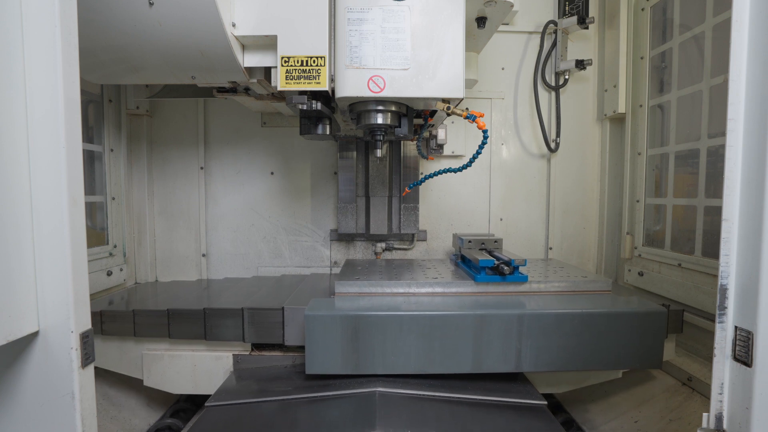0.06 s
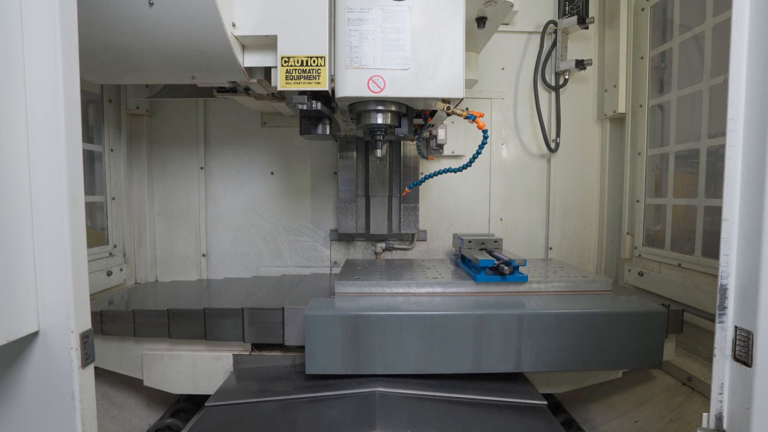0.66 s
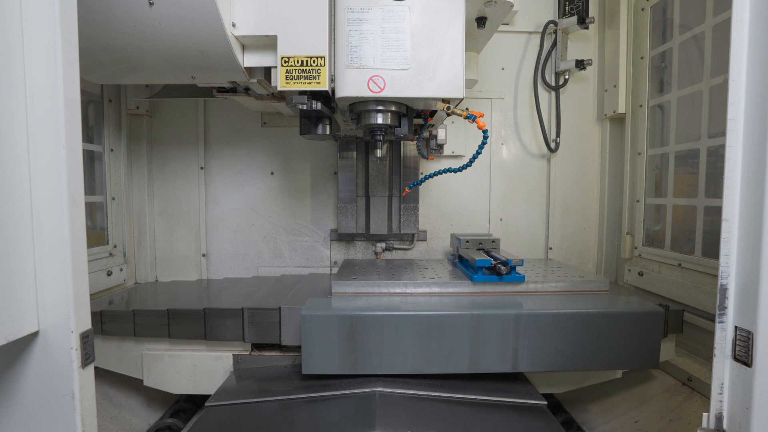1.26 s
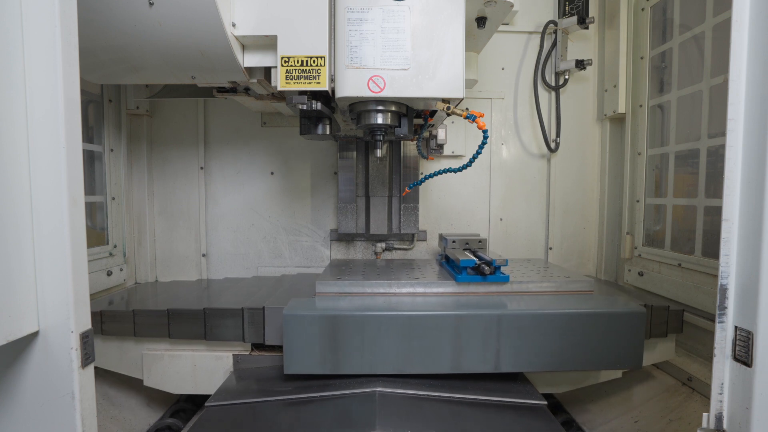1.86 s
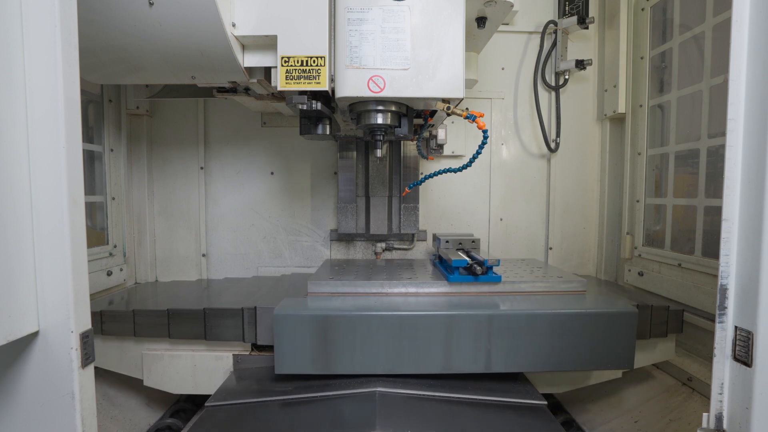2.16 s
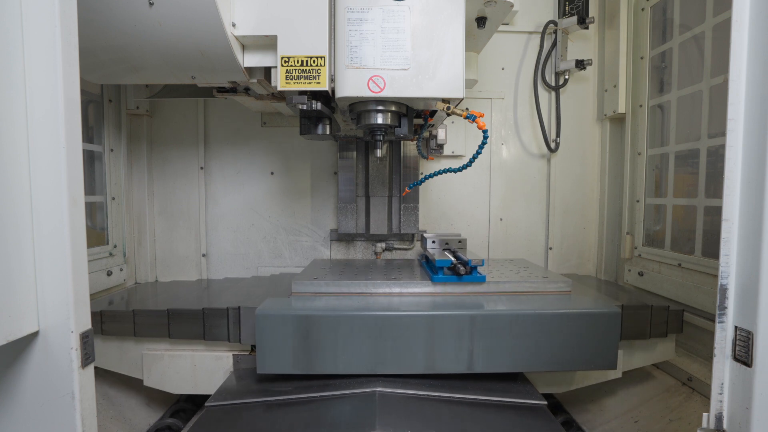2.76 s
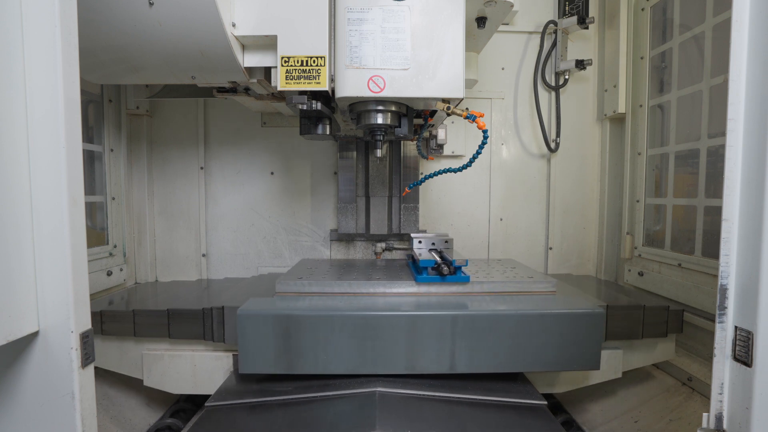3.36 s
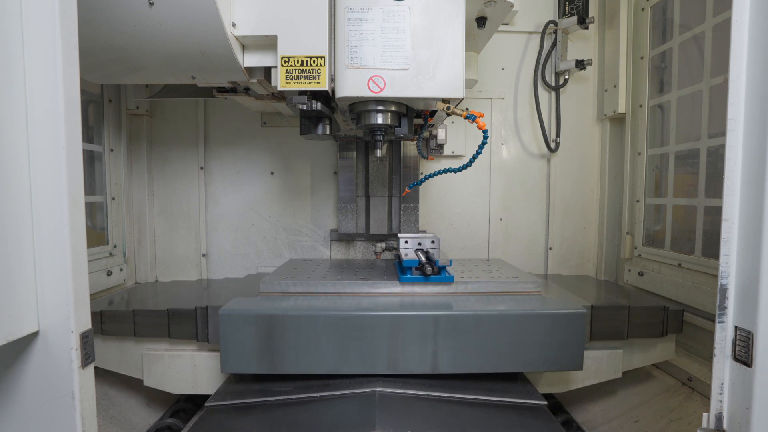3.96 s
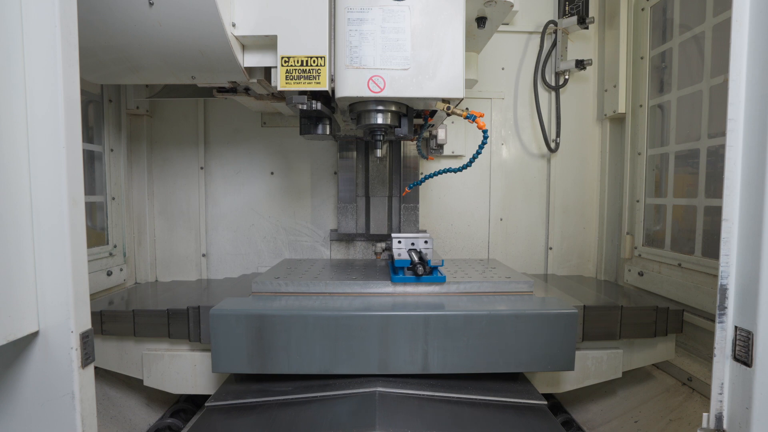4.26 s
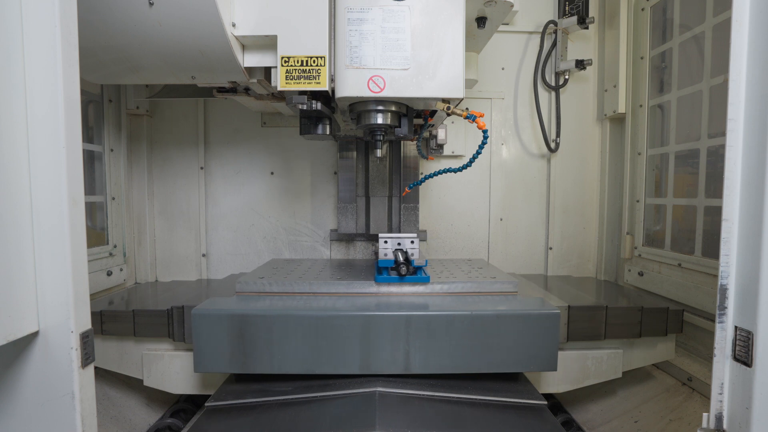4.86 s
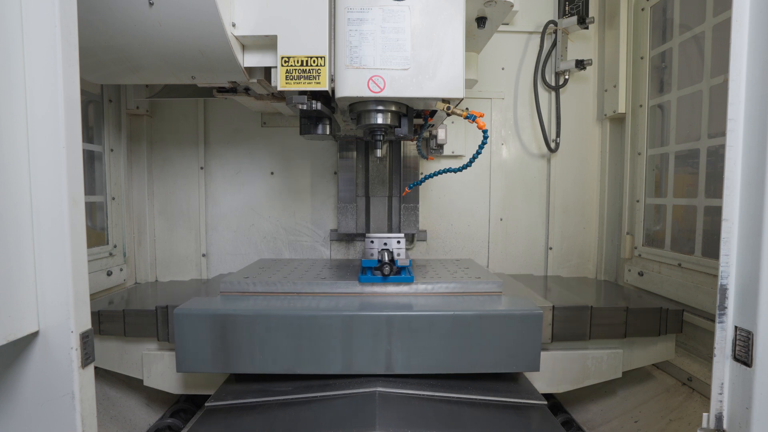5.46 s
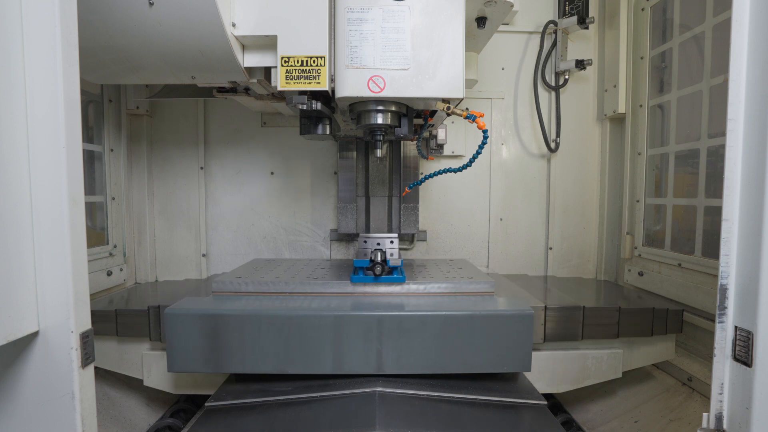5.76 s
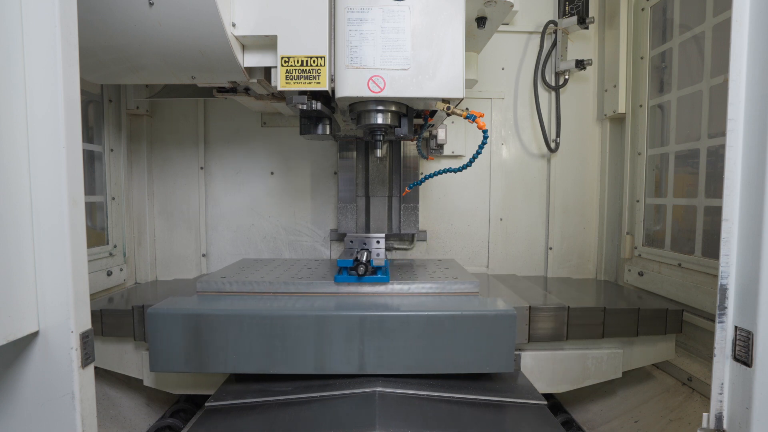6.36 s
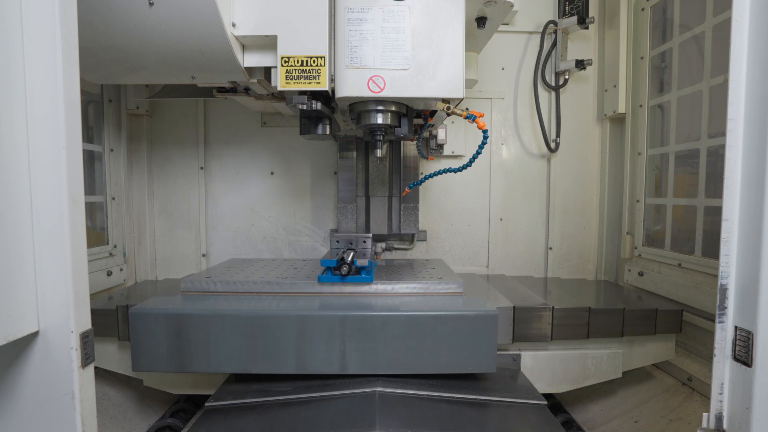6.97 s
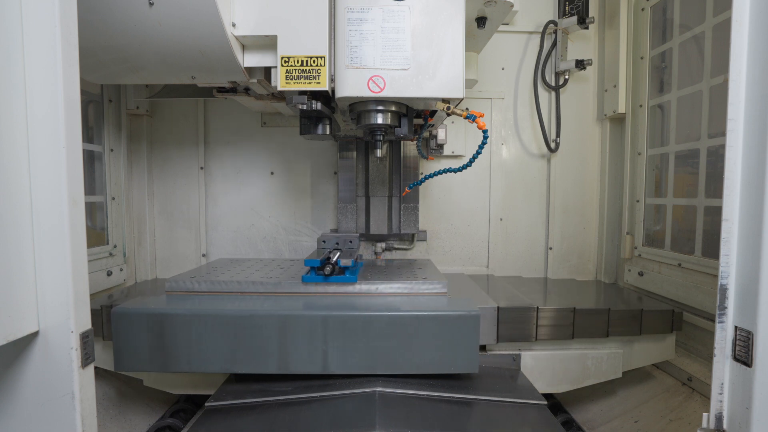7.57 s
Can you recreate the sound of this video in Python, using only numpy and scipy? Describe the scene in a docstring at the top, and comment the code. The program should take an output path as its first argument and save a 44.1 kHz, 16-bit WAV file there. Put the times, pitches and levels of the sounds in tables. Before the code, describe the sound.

A milling machine spindle spins up with a rising hum and whine, then holds a steady high speed over fan noise and hiss.

```python
"""A rising hum and whine: a machining centre's spindle runs up to 10000 rpm in its open steel enclosure
and holds that speed. Shaft orders, tones at multiples of the shaft speed, swell and fade as they cross
the enclosure's standing waves and as the table glides by. The ball bearings sing, loudest under
acceleration, over the hiss of air and the drone of fans and pumps."""
import sys
import numpy as np
from scipy import signal
from scipy.fft import rfft, irfft
from scipy.io import wavfile
from scipy.ndimage import uniform_filter1d

SR = 44100
rng = np.random.default_rng(int(sys.argv[2]) if len(sys.argv) > 2 else 0)


def generate_wav(signal):
    """Clip the signal to [-1, 1] and save it as 16-bit WAV at the path in sys.argv[1]."""
    frames = np.transpose(np.atleast_2d(signal))
    scaled = np.clip(frames, -1, 1) * 32767
    pcm = np.round(scaled).astype(np.int16)
    wavfile.write(sys.argv[1], SR, pcm)


N = 339570
TIME = np.arange(N) / SR
START_HZ, FULL_HZ = 104.63, 166.63  # shaft turns per second


def run_up(balance_hz=208.77, inertia_s=3.34, ease_s=0.21):
    """Shaft speed and the drive's pull (1 to 0): constant power fights drag until the set speed is held."""
    free_hz = np.sqrt(balance_hz ** 2 - (balance_hz ** 2 - START_HZ ** 2) * np.exp(-TIME / inertia_s))
    speed = uniform_filter1d(np.minimum(free_hz, FULL_HZ), size=4001, mode="nearest")
    pull = uniform_filter1d((free_hz < FULL_HZ) * 1., int(ease_s * SR), mode="nearest")
    return speed, pull


# Enclosure resonances that lift a passing order: (pitch [Hz], half width [Hz], boost [dB])
ENCLOSURE_PEAKS = [(127, 7.5, 6.4), (163, 5, 11), (286, 11.6, 9.1), (494, 6, 7.5), (562, 18, 8.7),
                   (590, 8.8, 6), (664.6, 6.3, 5.7), (1000, 26, 5), (1068, 18, 3), (1146, 13, 5.5),
                   (1211, 11, 7.5), (1233, 11, 9), (1279, 9, 4.5), (1307, 9, 4)]
# Standing-wave nodes at the listener: (pitch [Hz], half width [Hz], dip [dB])
ENCLOSURE_NODES = [(112, 2, -10), (242, 15, -12), (424, 8, -6), (504, 2, -7), (531, 6.5, -7),
                   (613, 2.8, -9), (634, 17, -6), (753, 31, -9.6), (872, 20, -12), (938, 9, -9),
                   (1010, 4, -11), (1036, 5, -14), (1113, 8, -9), (1170, 5, -9), (1258, 10, -11),
                   (1295, 3.5, -4)]
# The gliding table rides orders 4, 8 and 12: (time [s], level change [dB], pan change to the left [dB])
HUM_RIDE = [(2.3, 1, 5), (2.5, -0.3, 2.46), (3.7, -2.15, 0.8), (4.5, -0.3, 0.9), (6.5, 0, 1.4),
            (7.7, -1.7, -1)]
WHINE_RIDE = [(2.3, -20, -11), (2.5, -0.5, 3.99), (2.9, 3, 1.17), (3.6, 3, 1), (4.35, 0.04, 4.26),
              (5.8, 1.8, -1.5), (6.3, -3.5, -6), (6.8, 0.1, 5), (7.7, 0.7, -0.01)]
TOP_RIDE = [(2.3, -6, 0.0), (2.8, -3.26, -11), (3.3, 3, -17), (4.2, 5, 2.06), (5.7, -5.5, -3),
            (6.5, 3.5, 2), (7.0, -0.5, -15), (7.7, 3.5, -15)]
# The body of the hum and whine: (pitch [x shaft speed], start level [dB], late run-up level [dB],
# idle level [dB], pan left [dB], left ear's lead [rad])
STRONG_ORDERS = [(1, -54.5, -53, -55, 0.5, 0), (2, -46.5, -39.5, -40, 2.5, 0.3),
                 (3, -56, -48, -54, 0, -0.11), (4, -43.5, -29.5, -29.5, 0, -0.15),
                 (6, -53, -53, -58, -4, 0), (8, -41.5, -29.5, -31.5, -3, -0.69),
                 (12, -47, -43.5, -47.5, -3.5, -0.64)]
def motor(angle, speed, pull, flutter=0.045, flutter_hz=20, echo_gain=0.36, echo_hz=1200):
    """Strong shaft orders flutter slightly as they sweep through the enclosure's resonances and nodes."""
    rides = {4: HUM_RIDE, 8: WHINE_RIDE, 12: TOP_RIDE}
    out = np.zeros((2, N))
    for order, start_db, late_db, idle_db, pan_db, lead in STRONG_ORDERS:
        hz = order * speed
        ride_db, swing_db = (1 - pull) * automation(rides[order]) if order in rides else (0, 0)
        colour_db = bells(ENCLOSURE_PEAKS, hz) + bells(ENCLOSURE_NODES, hz)
        level = amp(load_level(speed, pull, start_db, late_db, idle_db) + colour_db + ride_db)
        phase = order * angle + rng.uniform(0, 2 * np.pi) + flutter * wander(flutter_hz)
        ear_phases = np.array([phase + lead / 2, phase - lead / 2])
        tone = enclosed_tone(ear_phases, hz, echo=echo_gain * pull * hz / echo_hz, spacing_hz=12)
        tremble = 1 + flutter * wander(flutter_hz)
        out += level * tremble * panned(pan_db + swing_db) * tone
    return out


# Housing resonances that lift a passing bearing tone: (pitch [Hz], half width [Hz], boost [dB])
HOUSING_PEAKS = [(2560, 80, 5.5), (2730, 55, 5), (2885, 45, 7), (3510, 80, 10.5), (3755, 65, 12),
                 (4103, 14, 12.5), (4290, 130, 10), (4510, 80, 4.5), (4780, 130, 4), (6350, 220, 8),
                 (7020, 170, 10)]
# Where the shaft shakes its bearings hardest: (speed [turns/s], half width [turns/s], boost [dB])
CRITICAL_SPEED = [(136, 13, 4.5)]
# Ball-pass tones and sidebands:
# (pitch [x shaft speed], start level [dB], late run-up level [dB], idle level [dB])
BALL_TONES = [(16.95, -68, -49, -72), (17.95, -66, -45.5, -70), (18.95, -61, -48, -68),
              (19.95, -63, -50, -72), (20.645, -70, -54, -53), (23.8, -56, -58, -68),
              (25.683, -47.5, -52.5, -61.5), (32.15, -53, -52.5, -66), (36.5, -59, -76, -74),
              (41.29, -64, -64, -67), (44.6, -48, -80, -74), (49.6, -60, -80, -76), (51.37, -55, -72, -68),
              (56, -54, -82, -76)]
def bearings(angle, speed, pull, torque, steady_skid_rad=0.008, skid_rad=0.011, chatter=0.4):
    """Ball-pass tones sing through the housing's resonances; under torque the balls skid and chatter."""
    out = np.zeros((2, N))
    for order, start_db, late_db, idle_db in BALL_TONES:
        hz = order * speed
        boost_db = bells(HOUSING_PEAKS, hz) + bells(CRITICAL_SPEED, speed)
        level = amp(load_level(speed, pull, start_db, late_db, idle_db) + boost_db)
        slip = (steady_skid_rad + skid_rad * torque) * wander(rate_hz=20)
        contact = 1 + chatter * torque * wander(rate_hz=25)
        out += level * contact * enclosed_tone(order * (angle + slip), hz, echo=0.42)
    return out * panned(left_db=-3)


# The sheen on the whine:
# (pitch [x shaft speed], full-torque level [dB], zero-torque level [dB], pan left [dB])
WEAK_ORDERS = [(5, -53, -63, 0), (7, -62, -57, 1), (9, -56, -56, -2), (10, -53, -59, -4),
               (16, -55, -54, -1), (17, -58, -60, 5), (18, -56, -59, -4), (20, -57, -54, 2),
               (24, -58, -49.5, 3), (36, -66, -63, 5)]
def overtones(angle, speed, torque):
    """Weak shaft orders thicken the whine, their balance following the torque."""
    out = np.zeros((2, N))
    for order, loaded_db, free_db, pan_db in WEAK_ORDERS:
        tone = enclosed_tone(order * angle + rng.uniform(0, 2 * np.pi), order * speed, echo=0.5)
        out += amp(free_db + torque * (loaded_db - free_db)) * panned(pan_db) * tone
    return out


# The noise bed, fans below and full-speed spindle hiss above: (frequency [Hz], density [dB/Hz])
FAN_DRONE = [(20, -100), (35, -91), (60, -90), (95, -81.5), (130, -83), (215, -82), (290, -78),
             (370, -78.5), (450, -72), (540, -73.5), (610, -68.5), (700, -72), (800, -76), (1000, -71)]
SPINDLE_HISS = [(1000, -70.4), (1130, -71.5), (1270, -66.6), (1400, -71.0), (1700, -73.0), (2200, -70.6),
                (2600, -70.3), (3600, -66.7), (4300, -68.7), (4800, -72.1), (7000, -74.0), (7400, -75.6),
                (8000, -80.6), (12200, -90.5), (13700, -90.6), (15600, -96.3)]
# Rumble and rasp while the drive pulls: (centre [Hz], half width [Hz], density [dB/Hz])
STRAIN_BANDS = [(50, 12, -86), (153, 30, -74.5), (2350, 1400, -74), (3650, 340, -68)]
# Brief panel shudders: (time [s], half length [s], centre [Hz], half width [Hz], density [dB/Hz])
PANEL_SHUDDERS = [(0.09, 0.089, 196, 27, -60.5), (.08, 0.071, 340, 120, -66), (0.034, 0.086, 3700, 69, -75),
                  (1.9, 0.17, 2700, 470, -70)]
# Where the noise sits: (frequency [Hz], pan left [dB])
AIR_PAN = [(130, 0), (400, -1.5), (600, 1.5), (900, 0), (1250, -0.5), (1550, -1), (2400, -1.5),
           (3000, -0.5), (4300, -.7), (6400, -4.5), (7300, -0.5), (8300, -3), (11000, -1.5), (15600, -.3)]
# How narrow its image is: (frequency [Hz], left-right correlation [0 to 1])
AIR_CORRELATION = [(130, 1), (200, 1), (500, 0.85), (670, 0.83), (740, 0.71), (850, 0.8), (1300, 0.57),
                   (1750, 0.77), (2500, 0.33), (3200, 0.22), (4300, 0.12), (6000, 0.3), (9000, .03),
                   (11500, 0.16), (14000, 0.39)]
def air(speed, pull, windage_db=12.5, patch_db=0.83, ripple_db=2.0, flicker_db=0.28):
    """Fan drone, hiss that grows with speed, rasp and shudders, with a drifting texture."""
    hz, frame_s, noise = signal.stft(rng.standard_normal((2, N)), SR, nperseg=2048, noverlap=1536)
    bin_hz = hz[:, None]
    hiss_band = bin_hz > FAN_DRONE[-1][0]
    pace = np.interp(frame_s, TIME, speed / speed[-1])
    rise_db = windage_db * (pace - 1) * hiss_band
    power = amp(np.where(hiss_band, spectrum(SPINDLE_HISS, bin_hz) + rise_db,
                         spectrum(FAN_DRONE, bin_hz))) ** 2
    strain = np.interp(frame_s, TIME, pull) * amp(rise_db) ** 2
    for centre, width, db in STRAIN_BANDS:
        power += strain * band_power(bin_hz, centre, width, db)
    for time_s, half_s, centre, width, db in PANEL_SHUDDERS:
        power += np.exp(-((frame_s - time_s) / half_s) ** 2) * band_power(bin_hz, centre, width, db)
    # Texture: drifting patches of colour, a still ripple on each ear's hiss, a flicker of the whole hiss.
    patches = uniform_filter1d(rng.standard_normal(power.shape), size=30, axis=0)
    patches = uniform_filter1d(patches, size=6, axis=1)
    ripple = uniform_filter1d(rng.standard_normal((2,) + bin_hz.shape), size=2, axis=1) * np.sqrt(2)
    flicker = rng.standard_normal(len(frame_s))
    texture_db = patch_db * patches / patches.std() + hiss_band * (ripple_db * ripple + flicker_db * flicker)
    correlation = spectrum(AIR_CORRELATION, bin_hz)
    mid = np.sqrt((1 + correlation) / 2) * noise[0]
    side = np.sqrt((1 - correlation) / 2) * noise[1]
    stereo = np.array([mid + side, mid - side]) * panned(spectrum(AIR_PAN, hz))[:, :, None]
    stereo *= np.sqrt(power * SR / 2) * amp(texture_db)
    return signal.istft(stereo, SR, nperseg=2048, noverlap=1536)[1][:, :N]


# Fan and pump hums at the back of the mix: (pitch [Hz], level [dB])
PUMP_HUMS = [(42.4, -78), (57.9, -78), (85.5, -81), (105.6, -75), (127.2, -84), (146.7, -73),
             (176.3, -68.5), (177.6, -59), (263.8, -66), (427.3, -83), (448.8, -66.5)]
def pumps(waver_rad=0.6):
    """Faint steady hums that beat against the shaft's lowest tone."""
    out = np.zeros(N)
    for hz, db in PUMP_HUMS:
        phase = 2 * np.pi * (hz * TIME + rng.random()) + waver_rad * wander(rate_hz=0.77)
        out += amp(db) * np.sqrt(2) * np.cos(phase)
    return out


def enclosed_tone(phase, hz, echo, spacing_hz=45, drift_hz=1.44):
    """A tone plus its reflections, which change at each ear as the pitch climbs and the table moves."""
    place = abs(hz - hz[0]) / spacing_hz + drift_hz * TIME
    field = rng.standard_normal((2, 2, 256)) / np.sqrt(2)
    knots = np.arange(field.shape[-1])
    in_phase, quadrature = np.array([[np.interp(place, knots, ear) for ear in part] for part in field])
    direct = np.cos(phase)
    reflections = in_phase * direct + quadrature * np.sin(phase)
    return np.sqrt(2) * (direct + echo * reflections) / np.sqrt(1 + echo ** 2 / 2)


def load_level(speed, pull, start_db, late_db, idle_db):
    """A level in dB that follows the speed while the drive pulls, then settles as the load comes off."""
    progress = (speed - START_HZ) / (FULL_HZ - START_HZ)
    return pull * (start_db + (late_db - start_db) * progress) + (1 - pull) * idle_db


def bells(table, hz):
    """The boost or cut in dB that bell-shaped peaks and dips give a moving pitch."""
    gain_db = sum(db * np.exp(-((hz[::32] - centre) / width) ** 2) for centre, width, db in table)
    return np.interp(TIME, TIME[::32], gain_db)


def band_power(hz, centre, width, db):
    """The power spectrum of a soft-edged noise band."""
    return amp(db) ** 2 / (1 + ((hz - centre) / width) ** 2) ** 2


def spectrum(points, hz):
    """A curve through breakpoints on a log-frequency axis."""
    point_hz, value = np.transpose(points)
    return np.interp(np.log(hz + 1), np.log(point_hz + 1), value)


def automation(rows):
    """Timed breakpoints as one lane per column, one value a sample."""
    time_s, *columns = np.transpose(rows)
    return np.array([np.interp(TIME, time_s, column) for column in columns])


def wander(rate_hz, control_hz=400):
    """Smooth random motion of rms 1, up to about the given rate."""
    hz = np.fft.rfftfreq(4096, 1 / control_hz)
    drift = irfft(rfft(rng.standard_normal(4096)) / np.sqrt(1 + (hz / rate_hz) ** 4))
    return np.interp(TIME, np.arange(len(drift)) / control_hz, drift / drift.std())


def panned(left_db):
    """Left and right gains of mean power 1."""
    pair = amp([left_db / 2, -left_db / 2]).reshape(2, -1)
    return pair / np.sqrt(np.mean(pair ** 2, axis=0))


def amp(db):
    """Decibels to gain."""
    return 10 ** (np.asarray(db) / 20)


def scene(idle_torque=0.17):
    """One shaft angle drives every spindle tone; the torque drops away once full speed is reached."""
    speed, pull = run_up()
    torque = idle_torque + (1 - idle_torque) * pull
    angle = 2 * np.pi * np.cumsum(speed) / SR
    whine = motor(angle, speed, pull) + overtones(angle, speed, torque)
    return whine + bearings(angle, speed, pull, torque) + air(speed, pull) + pumps()


def record(dry, cutoff_hz=15730):
    """A steep low-pass trims the very top of the hiss."""
    low_pass = signal.firwin(1023, cutoff_hz, window=("kaiser", 9), fs=SR)
    return signal.oaconvolve(dry, low_pass[None], "same")


dry = scene()
out = record(dry)
generate_wav(out)
```